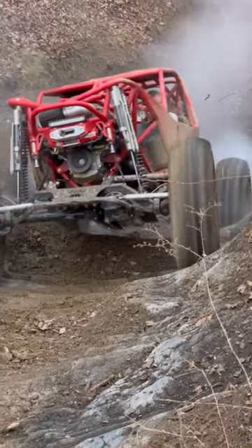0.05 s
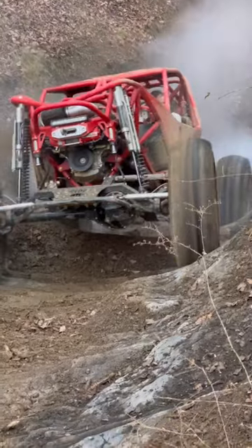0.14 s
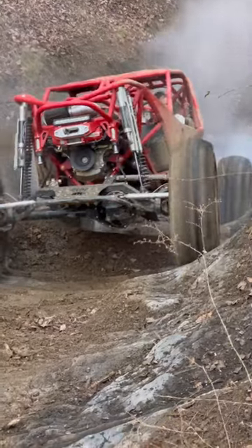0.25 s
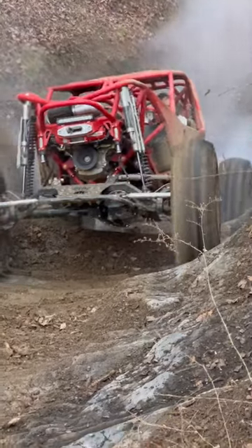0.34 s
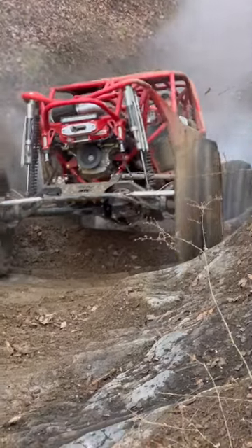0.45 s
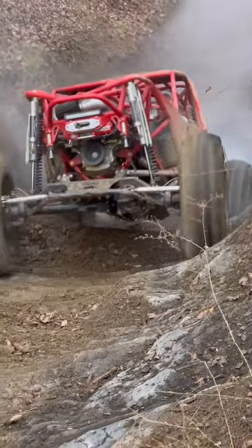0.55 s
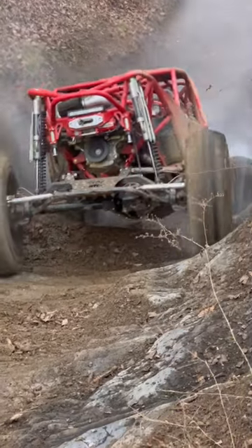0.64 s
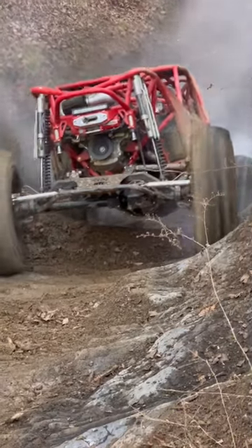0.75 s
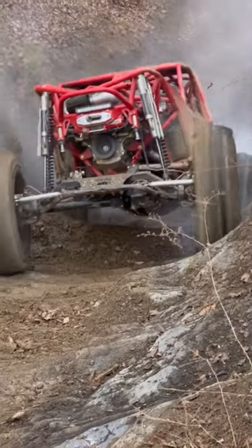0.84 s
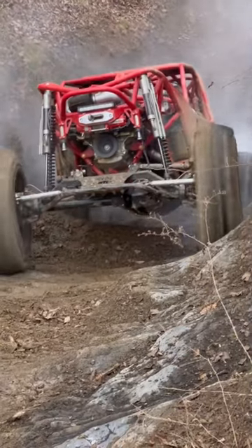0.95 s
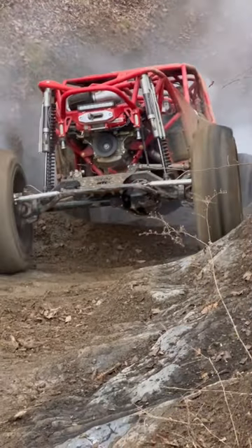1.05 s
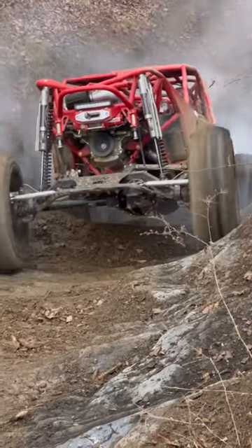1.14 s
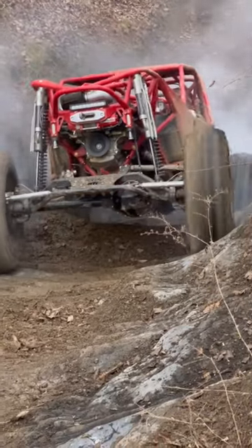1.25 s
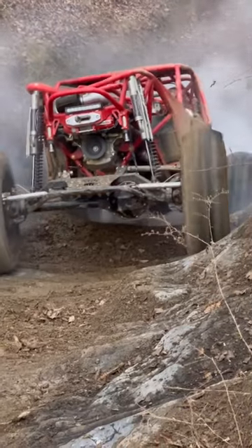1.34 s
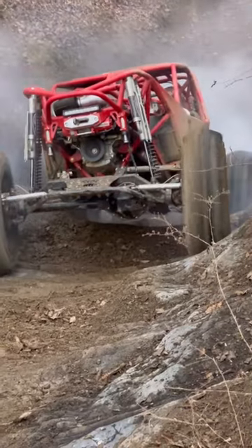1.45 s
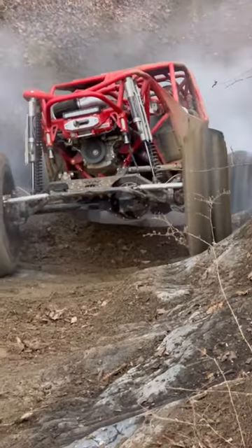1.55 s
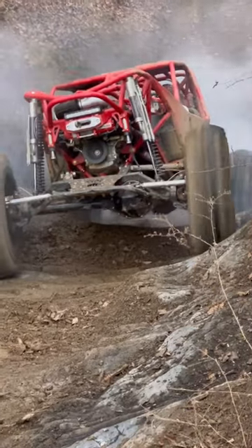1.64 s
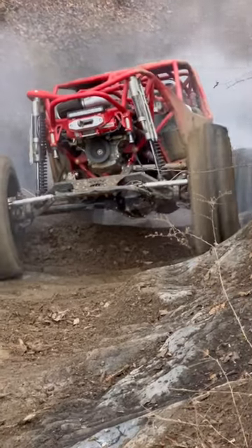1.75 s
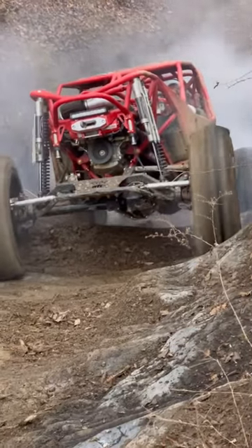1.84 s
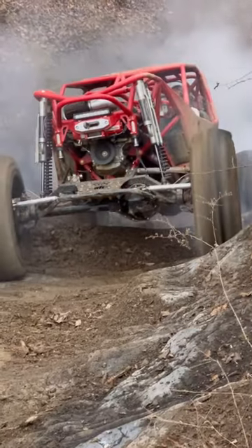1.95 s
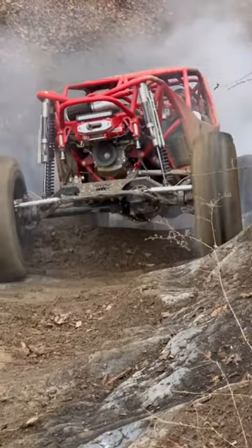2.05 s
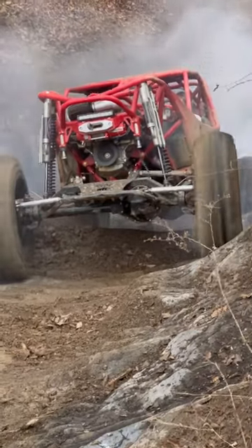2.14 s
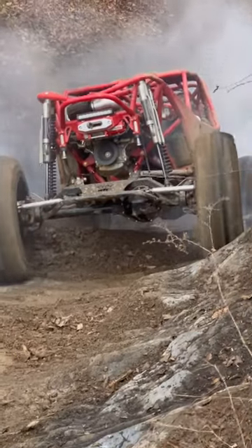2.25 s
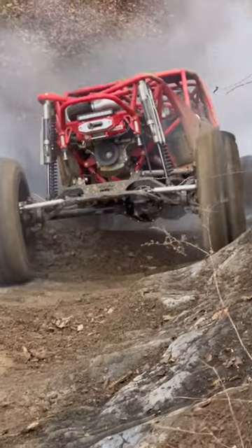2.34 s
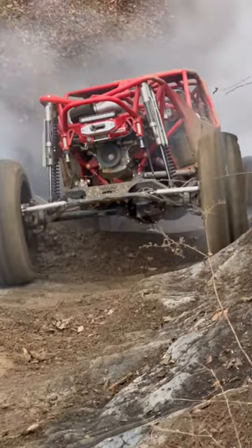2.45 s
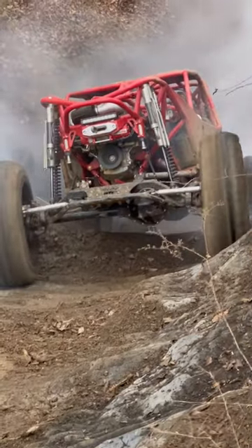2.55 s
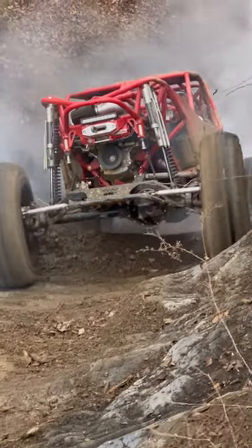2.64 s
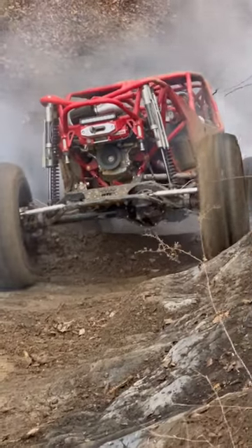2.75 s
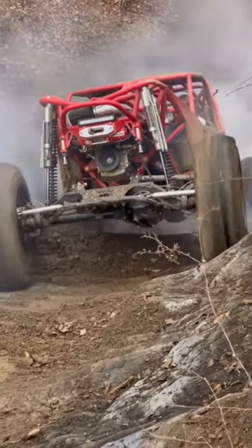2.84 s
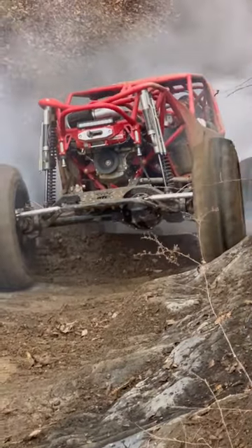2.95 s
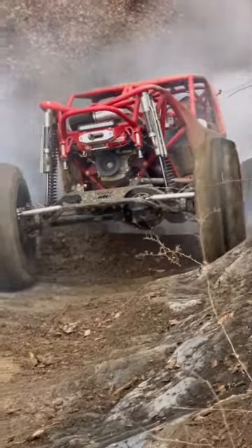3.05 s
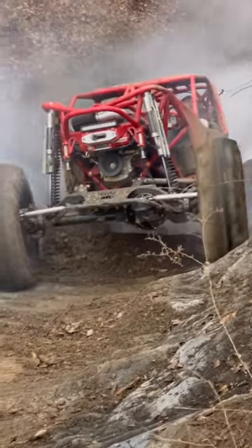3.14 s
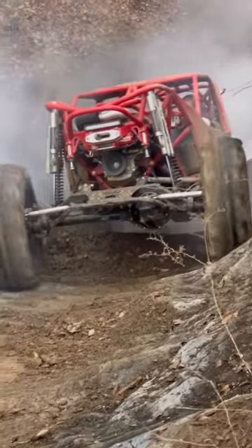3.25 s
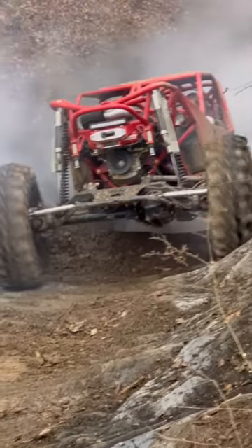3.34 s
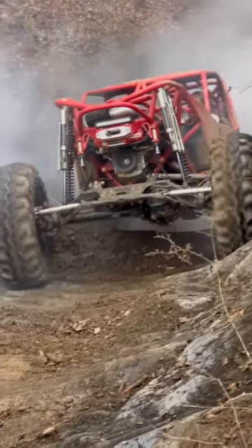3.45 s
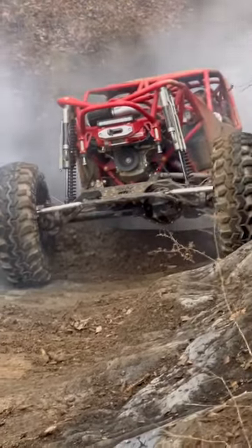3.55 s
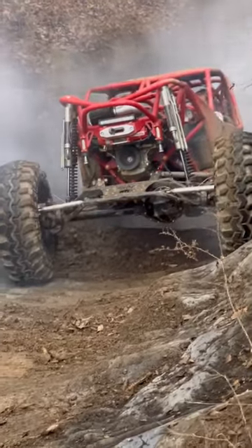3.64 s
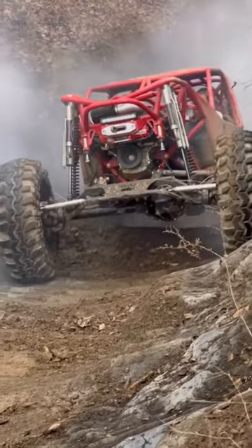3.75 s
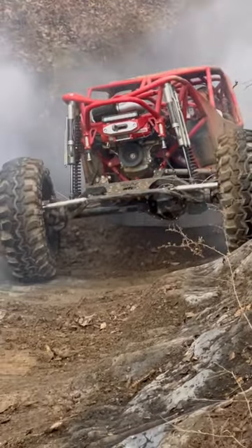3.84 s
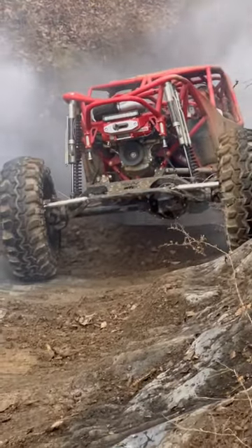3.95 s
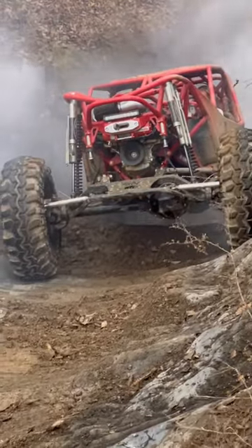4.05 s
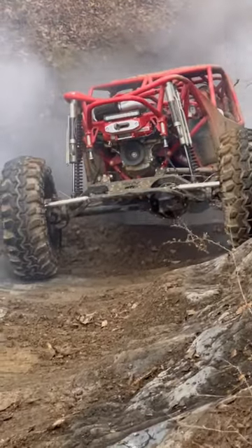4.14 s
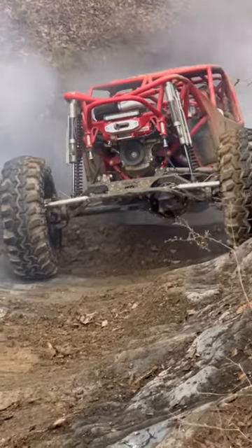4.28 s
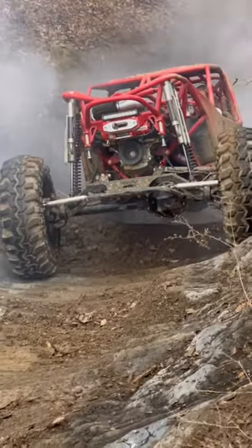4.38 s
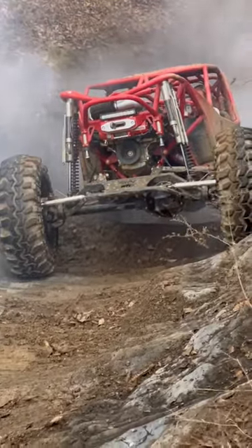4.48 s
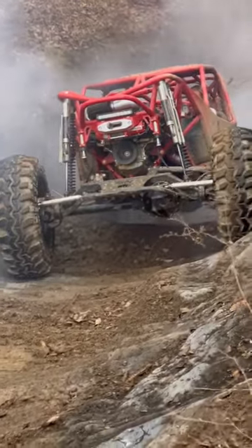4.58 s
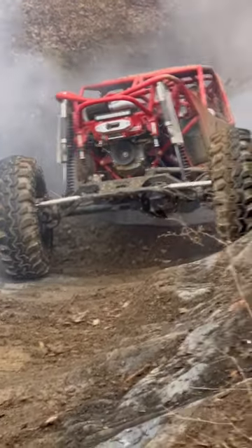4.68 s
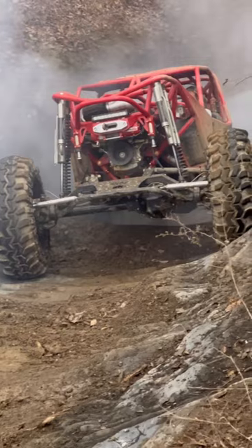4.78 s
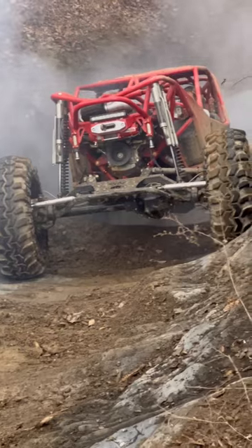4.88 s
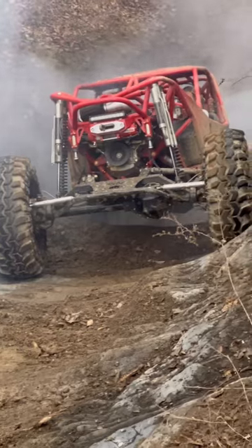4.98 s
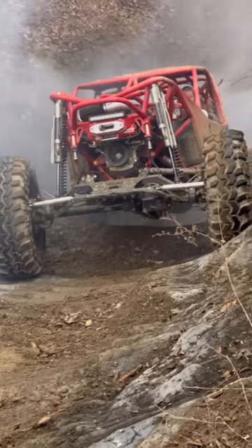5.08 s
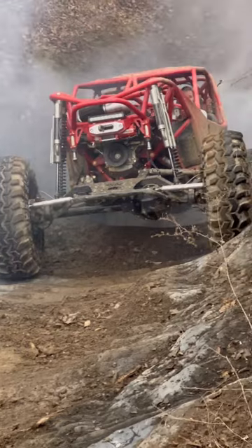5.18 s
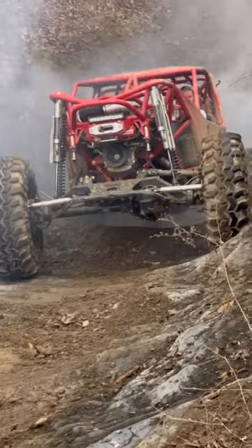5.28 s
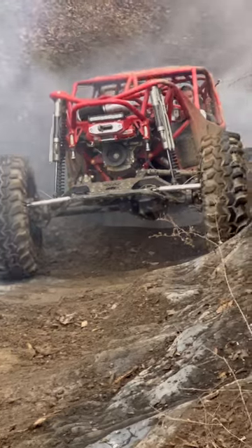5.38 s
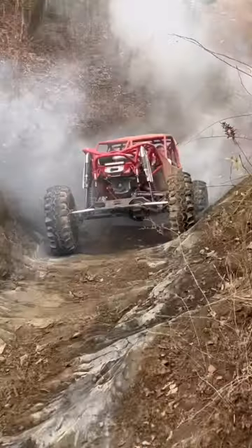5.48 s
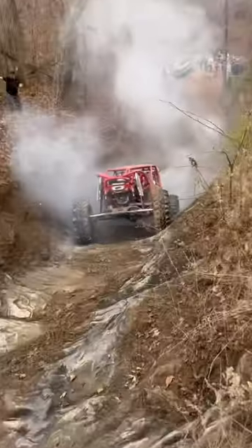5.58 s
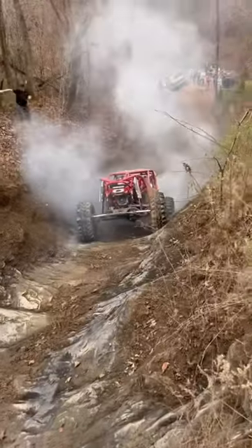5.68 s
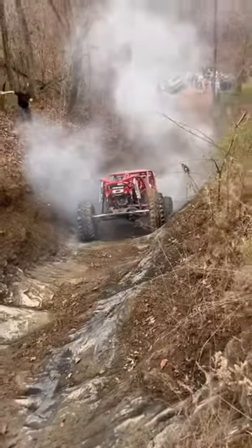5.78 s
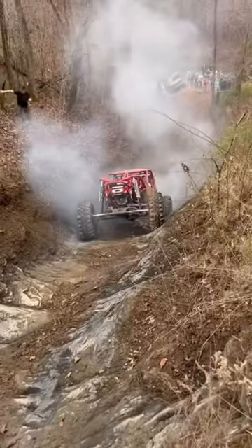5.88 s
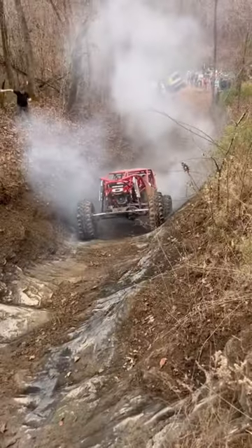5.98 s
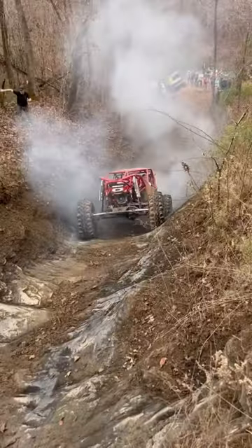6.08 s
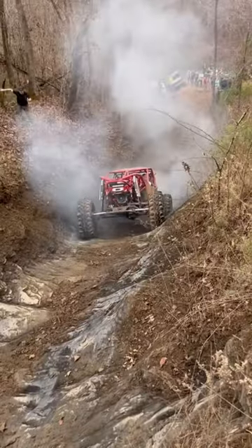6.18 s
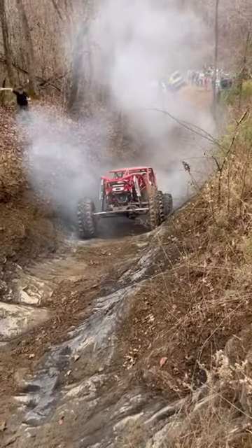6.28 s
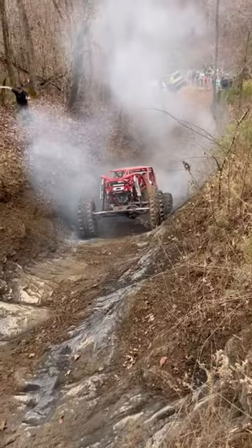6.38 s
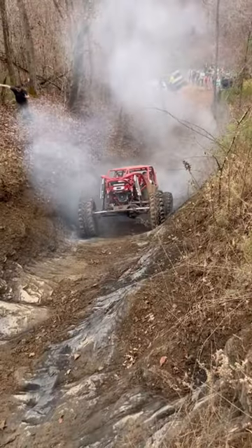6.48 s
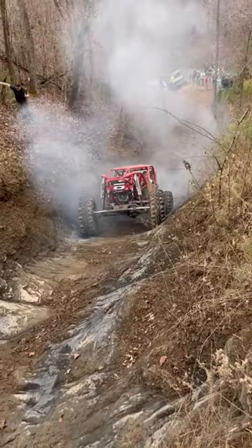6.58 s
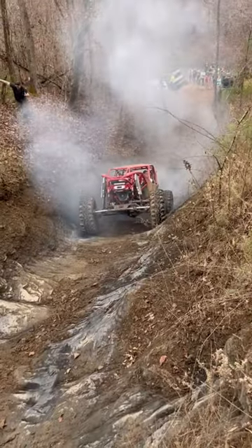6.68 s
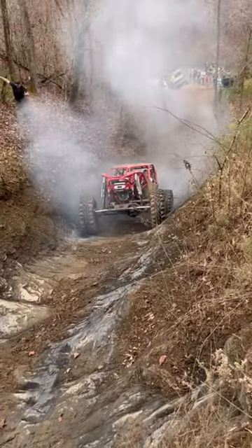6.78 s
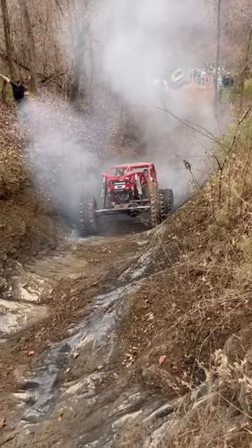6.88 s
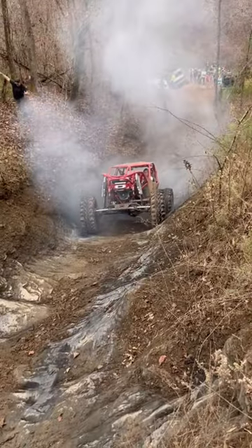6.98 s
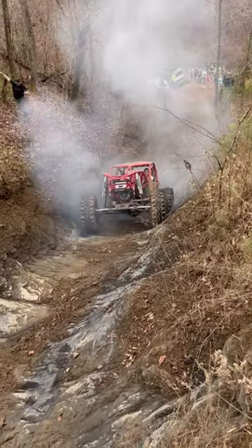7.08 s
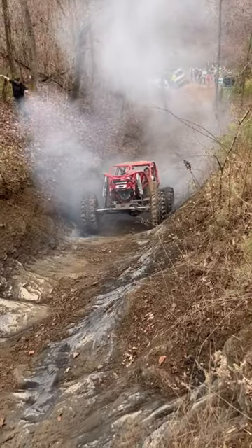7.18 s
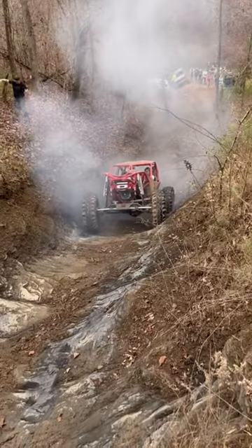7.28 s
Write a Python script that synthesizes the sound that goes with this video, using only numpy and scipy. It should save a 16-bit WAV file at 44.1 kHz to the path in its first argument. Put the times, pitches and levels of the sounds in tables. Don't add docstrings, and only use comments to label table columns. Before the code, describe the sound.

A powerful eight-cylinder off-road buggy on a rocky dirt trail. Pipes burble after a throttle lift, then three roaring surges rise slightly in pitch, each ending in a short popping gap. Tyres chirp faintly and spray gravel. The engine coasts down and settles into an uneven, loping idle with light clatter. Outdoors, close and dry, slightly compressed at the loudest peaks, nearly mono.

```python
import sys
import numpy as np
from scipy import signal
from scipy.fft import rfft, irfft, next_fast_len
from scipy.io import wavfile
from scipy.ndimage import uniform_filter1d, map_coordinates

SR = 44100
rng = np.random.default_rng(int(sys.argv[2]) if len(sys.argv) > 2 else 0)


def invert_db(x):
    u = np.asarray(x, float) / 20
    return 10 ** u


def store_pcm(level_fs):
    pcm = np.round(np.clip(level_fs, -1, 1) * 32767).astype(np.int16)
    wavfile.write(sys.argv[1], SR, np.atleast_2d(pcm).T)


N = 322812
TIME = np.arange(N) / SR


def evened(x):
    return x / np.sqrt(np.mean(abs(x) ** 2) + 1e-20)


def read(points, hz, axis=1):
    table = np.transpose(points)
    return np.interp(np.log(hz + 1), np.log(table[0] + 1), table[axis])


def follow(rows, axis):
    table = np.transpose(rows)
    return np.interp(TIME, table[0], table[axis])


def colour(x, points):
    size = next_fast_len(N)
    gain = invert_db(read(points, np.fft.rfftfreq(size, 1 / SR)))
    return evened(irfft(rfft(x, size) * gain, size)[:N])


def resonate(x, hz, width):
    r = np.exp(-np.pi * width / SR)
    pole = r * np.exp(2j * np.pi * hz / SR)
    return 2 * signal.lfilter([1 - r], [1, -pole], x).real


def twice(x, hz, width):
    return resonate(resonate(x, hz, 2 * width), hz, width)


def drift(hz, count):
    steps = rng.standard_normal((count, 1500))
    span = max(int(100 / hz), 1)
    steps = uniform_filter1d(uniform_filter1d(steps, span), span)
    return [np.interp(TIME * 200, np.arange(1500), evened(row)) for row in steps]


def bend(u, curve):
    return (1 - np.exp(-curve * np.clip(u, 0, 1))) / (1 - np.exp(-curve))


def after(s, delay, width, db):
    return db * np.exp(-((TIME - s - delay) / width) ** 2)


def lift(s, length):
    u = np.clip((TIME - s) / length, 0, 1)
    return np.sin(np.pi * u ** 0.46)


# t/s, level/dB, f/Hz
TICKS = [
    (4.135, -69, 4000),
    (5.443, -62, 2000),
]
# t/s, length/s, f/Hz, level/dB
SQUEAK = (5.345, .065, 7400, -71)


def small_sounds():
    out = np.zeros(N)
    for s, db, hz in TICKS:
        decay = np.exp(-np.maximum(TIME - s, 0) / .012) * (TIME > s)
        burst = rng.standard_normal(N) * decay
        out += invert_db(db) * 2 * resonate(burst, hz, 0.55 * hz)
    s, length, hz, db = SQUEAK
    swell = np.sin(np.pi * np.clip((TIME - s) / length, 0, 1)) ** 0.65
    return out + invert_db(db) * swell * np.sin(2 * np.pi * hz * TIME)


# t/s, length/s, f/Hz, level/dB
CHIRPS = [
    (.3, .08, 1920, -40),
    (1.15, 0.11, 3170, -47),
]


def chirps():
    noise = rng.standard_normal(N)
    return sum(invert_db(db) * lift(s, length) * evened(twice(noise, hz, 70)) for s, length, hz, db in CHIRPS)


# lowest at t/s, rate/Hz, highest at t/s, rate/Hz, early bend of the climb
REVS = [
    (-.5, 45, .04, 54.3, 1.01),
    (.31, 45.2, .832, 55.8, 1.2),
    (1.168, 43.6, 1.662, 56.3, .7),
    (1.955, 45.5, 2.578, 55.9, 1.02),
]
# t/s, cycle rate/Hz
RUN_DOWN = [(2.67, 50.4), (2.86, 42.0), (3.1, 34.1), (3.43, 19.9), (3.6, 14.7), (3.81, 11.81), (4.0, 9.93),
            (4.2, 9.23), (4.4, 9.33), (4.65, 10.22), (4.9, 9.22), (5.5, 8.71), (6.0, 8.8), (7.32, 8.84)]


def speed():
    rate = follow([REVS[-1][2:4]] + RUN_DOWN, axis=1)
    for (t0, low, t1, top, curve), later in zip(REVS, REVS[1:] + [None]):
        climb = low + (top - low) * bend((TIME - t0) / (t1 - t0), curve)
        rate = np.where((TIME >= t0) & (TIME < t1), climb, rate)
        if later:
            drop = top + (later[1] - top) * bend((TIME - t1) / (later[0] - t1), 1.0)
            rate = np.where((TIME >= t1) & (TIME < later[0]), drop, rate)
    return rate


# goes down t/s, time to reach the floor/s, lifts t/s, load level/dB
PEDAL = [
    (-.6, .1, 0.013, -1.5),
    (0.293, 0.047, .828, -1),
    (1.106, 0.18, 1.665, -0.5),
    (1.917, 0.12, 2.585, -2),
]


def crank():
    first_firing_s, catch = 4.277, 0.3
    idling = np.clip((TIME - 3.4) / .5, 0, 1)
    pulling = sum(1. * (TIME > down + catch * press) * (TIME < up) for down, press, up, db in PEDAL)
    throttle = uniform_filter1d(pulling, 900)
    rate = uniform_filter1d(speed(), 1200)
    turns = np.cumsum(rate) / SR
    turns = turns - turns[round(first_firing_s * SR)] % 1 + 1
    return rate, turns, throttle, idling


# pulling level/dB, coasting level/dB at 50 Hz, change per halved speed/dB,
# extra build-up/s, share lingering after a lift
LAYERS = [(-19, -28, 7, 0.0054, 0.068), (-24.5, -37.5, 17.5, 0.066, 0.71), (-27, -44.5, 15, 0.11, 0.95),
          (-42.5, -57, 7.5, 0.21, 0.91)]
# t/s, length/s
WHEELS_STOP = (3.1, .28)
TYRES_DB = [-0.5, 0, -2, -6.5]


def gas_db(rate, layer):
    bite_share, bite_delay_s, bite_s = 0.17, 0.024, 0.013
    lift_s, linger_s = 0.013, 0.066
    pull_db, coast_db, halved_db, build, linger = LAYERS[layer]
    coast_db = coast_db + halved_db * np.log2(np.minimum(rate, 50) / 50)
    coast_db += TYRES_DB[layer] * np.clip((TIME - WHEELS_STOP[0]) / WHEELS_STOP[1], 0, 1)
    if layer == 0:
        coast_db += -1.9 * (np.minimum(TIME, 1.5) - 1)
    boost = np.zeros(N)
    for down, press, up, load_db in PEDAL:
        since = np.maximum(TIME - up, 0)
        fall = (1 - linger) * np.clip(1 - since / lift_s, 0, 1) + linger * np.exp(-since / linger_s)
        bite = bite_share * np.clip((TIME - down - bite_delay_s) / bite_s, 0, 1)
        build_up = (1 - bite_share) * bend((TIME - down) / (press + build), 1.12)
        drive = (bite + build_up) * fall
        boost = np.maximum(boost, drive * (pull_db + load_db - coast_db))
    return coast_db + boost


# t/s, level/dB
GOVERNOR = [(3.4, -10), (3.6, -8.5), (3.8, -12), (4, -14), (4.2, -8), (4.65, -8), (5, -4.5), (5.6, -1.45),
            (7.32, 0.1)]
# settled level/dB, share of the effort, rise per doubled speed/dB
IDLE_LAYERS = [(-32, 0.72, -5.5), (-34.5, 0.64, 4), (-55.5, 0.39, -.4), (-67, 0.64, 17)]


def idle_db(rate, layer):
    db, share, doubled_db = IDLE_LAYERS[layer]
    return db + share * follow(GOVERNOR, axis=1) + doubled_db * np.log2(np.clip(rate / 8.8, 1, 2.3))


def rasp(noise, turns, throttle):
    top_order, lasts_s = 56, .125
    order = np.arange(257)
    a, b = noise[:2 * 60 * 257].reshape(2, 60, 257)
    pattern = irfft((a + 1j * b) / (1 + (order / top_order) ** 6), axis=1)
    pattern = np.concatenate([pattern, pattern[:, :1]], axis=1)
    locked = map_coordinates(pattern, [TIME / lasts_s, turns % 1 * 512], order=1)
    low = signal.sosfiltfilt(signal.butter(3, 50 * top_order, fs=SR, output="sos"), noise)
    share = .65 * throttle
    return noise - (1 - np.sqrt(1 - share)) * low + np.sqrt(share) * low.std() * evened(locked)


# f/Hz, level/dB per Hz
HISS_PULL = [(410, -31), (700, -1.5), (737, -5.5), (994, -8), (1260, -5), (1490, -13), (1630, -9),
             (2200, -10.5), (2440, -12), (5320, -21.5), (10300, -31.5), (11700, -29.5), (15600, -41)]
# f/Hz, level/dB per Hz
HISS_IDLE = [(530, -25), (900, -3), (1640, -12), (2130, -9), (2540, -10), (3270, -16), (3640, -17),
             (5030, -20), (7190, -23), (7730, -23.5), (10400, -27), (11700, -22.5), (15600, -35)]
# delay/s, width/s, level/dB
GULP = (-0.013, 0.037, 3.9)
# t/s, width/s, level/dB
SPRAYS = [
    (.19, .09, 6.5),
    (1.84, 0.09, 6),
]
# f/Hz, width/Hz, level/dB at 50 cycles per s
BELT = (4580, 730, -59)


def hiss(rate, turns, throttle, idling, cycle_depth=0.05, firing_depth=0.36):
    chop = 1 + cycle_depth * np.cos(2 * np.pi * turns) + firing_depth * np.exp(-(8 * turns % 1) / 0.59)
    noise = rng.standard_normal((3, N))
    noise[0] = rasp(noise[0], turns, throttle)
    noise = noise * chop * invert_db(0.46 * drift(12, count=1)[0])
    pull = colour(noise[0], HISS_PULL)
    top = signal.sosfiltfilt(signal.butter(2, 5000, "high", fs=SR, output="sos"), pull)
    fizz_db = gas_db(rate, layer=3) + sum(after(row[0], *GULP) for row in PEDAL)
    fizz_db += sum(after(s, 0, width, db) for s, width, db in SPRAYS)
    pull = invert_db(gas_db(rate, layer=2) + 2) * (pull - top) + invert_db(fizz_db + 2) * evened(top)
    hz, width, db = BELT
    pull += invert_db(db) * (rate / 50) ** 2 * evened(twice(noise[2], hz, width))
    idle_hiss = invert_db(idle_db(rate, layer=3)) * colour(noise[1], HISS_IDLE)
    return (1 - idling) * pull + idling * idle_hiss


def firings(turns, pattern_db, scatter_db):
    count = np.floor(8 * turns).astype(int)
    size_db = np.array(pattern_db)[count % 8] + scatter_db * rng.standard_normal(4000)[count]
    return invert_db(size_db) * (np.diff(count, prepend=count[0]) > 0)


CYLINDERS_DB = [-18, 0, 1, -24, -1, 0, -1, 0]
# f/Hz, width/Hz, level/dB
MUFFLER = [(169.5, 43.4, 10.5), (100, 24, -54)]
HEADER_DB = [-7, -30, -30, -30, -30, 0, -30, -30]
# f/Hz, width/Hz, level/dB, gain per firing a second above idle/dB
HEADER = (232, 52, -26.5, 3)
CLATTER_DB = [5, 3, 1, -1, 0, 0, -5, -7]
# f/Hz, width/Hz, level/dB
CASING = [(570, 118, 4.5), (713, 30.5, 4.5), (283, 20, -1.5), (1016, 84, -21), (98, 96, 16), (215, 91, -7)]


def idle(rate, turns, throttle, idling, lag_turns=.1):
    tone = np.sqrt(2) * np.cos(2 * np.pi * (8 * turns - lag_turns)) * invert_db(.8 * drift(10, count=1)[0])
    puffs = firings(turns, CYLINDERS_DB, scatter_db=1.3) * np.sqrt(70 / (8 * rate))
    puffs = uniform_filter1d(uniform_filter1d(puffs, 205), 150)
    ring = sum(invert_db(db) * twice(puffs, hz, width) for hz, width, db in MUFFLER)
    thumps = uniform_filter1d(firings(turns, HEADER_DB, scatter_db=3), 110)
    hz, width, db, gain_db = HEADER
    ring += invert_db(db + gain_db * np.clip(8 * rate - 68, 0, 6)) * twice(thumps, hz, width)
    clicks = firings(turns, CLATTER_DB, scatter_db=-2.5)
    knocks = signal.lfilter([1], [1, -np.exp(-1 / (0.018 * SR))], clicks)
    rattle = (knocks + .35) * rng.standard_normal(N)
    casing = sum(invert_db(db) * twice(rattle, hz, width) for hz, width, db in CASING)
    late = slice(5 * SR, N)
    layers = (tone, ring / ring[late].std(), 2.8 * casing / casing[late].std())
    return np.sqrt(idling) * sum(invert_db(idle_db(rate, k)) * x for k, x in enumerate(layers))


# t/s, length/s, level/dB
BURBLES = [
    (0.004, 0.19, -23.5),
    (0.822, 0.16, -24.5),
    (1.647, 0.12, -21.5),
    (2.577, 0.047, -21.5),
    (2.637, 0.077, -20.5),
]
# f/Hz, level/dB
BURBLE_TONE = [(30, -28), (55, -10), (105, -2), (160, -5.5), (260, -1.5), (400, -17.5), (620, -20),
               (1200, -54), (3000, -51.5)]


def burble():
    pops = rng.uniform(-1, 1, N) * (rng.random(N) < 350 / SR)
    return colour(pops, BURBLE_TONE) * sum(invert_db(db) * lift(s, length) for s, length, db in BURBLES)


def slow_level(x):
    return np.sqrt(uniform_filter1d(x ** 2, 5000) + 1e-4)


# f/Hz, level/dB
PIPE = [(45, -27.5), (100, -3.5), (143, -2.5), (180, -9), (225, 5), (275, 2), (320, -0.5), (385, -13.5),
        (435, -12), (480, -10.5), (590, -3.5), (720, -11), (1000, -11.5), (1500, -27.5)]
# f/Hz, level/dB
COAST_PIPE = [(40, -38.5), (70, 0), (110, -8), (145, -10), (185, 0), (240, -8), (290, -6.5), (340, -15),
              (430, -9), (600, -1), (800, -18.5), (1500, -28)]
# pulling level/dB, coasting level/dB
PATTERN = [(-2.5, -27), (-1.5, 10), (-5.5, -9.5), (4, 4), (-2, 1.5), (-0.5, 5.5), (-7, 3.5), (-8.5, 0),
           (4, 2.5), (1, -7.5), (-4.5, -1), (4.5, 4), (2.5, 0.5), (2.5, 7.5), (-4, 3), (2.5, 4)]
# delay/s, width/s, level/dB
REBOUND = (.085, 0.012, 5.8)


def roar(rate, turns, throttle, idling, pull_rough=.125, coast_rough=.23):
    part = slice(0, 4 * SR)
    body_db = gas_db(rate, layer=0) + sum(after(row[2], *REBOUND) for row in PEDAL)
    bark_db = gas_db(rate, layer=1)
    rate, turns, throttle = rate[part], turns[part], throttle[part]
    rough = coast_rough + (pull_rough - coast_rough) * throttle
    wobble, start = drift(14, count=64), rng.random(32)
    start[8] = -.1
    low, high = np.zeros(N), np.zeros(N)
    for k in range(1, 32):
        pull_db, coast_db = PATTERN[k % 16]
        coast_db = coast_db - 1.45 * max(k - 7, 0) * np.clip(1 - rate / 45, 0, 1)
        coast_db = coast_db - 6 * max(7 - k, 0) * np.clip(1 - rate / 24, 0, 1)
        coast_db = coast_db + 9 * (k in (6, 8)) * np.clip(3 - rate / 11, 0, 1)
        pull_db = pull_db + read(PIPE, k * rate)
        coast_db = coast_db + read(COAST_PIPE, k * rate)
        coast_waver = max(.3 * (k - 8), .6 - (k in (6, 8)))
        depth = rough * (1 + .08 * k * throttle + coast_waver * (1 - throttle))
        shake = depth * (wobble[k][part] + 1j * wobble[k + 32][part])
        line = ((1 + shake) * np.exp(2j * np.pi * (k * turns + start[k]))).real
        line *= invert_db(coast_db + (pull_db - coast_db) * throttle)
        upper = np.clip((k * rate - 350) / 80, 0, 1)
        low[part] += (1 - upper) * line
        high[part] += upper * line
    fuzz = invert_db(-16) * colour(rng.standard_normal(N), PIPE + [(3000, -60)])
    flutter = evened(twice(fuzz, 22, 30))[part]
    high[part] *= 1 + (1 - throttle) * (.8 * flutter - .45)
    lifted = 1 - 0.43 * sum(lift(s, length) for s, length, db in BURBLES)
    body = invert_db(body_db) * (low / slow_level(low) * lifted + fuzz)
    bark = invert_db(bark_db + 1.0) * high / slow_level(high)
    return (1 - idling) * (body + bark)


# f/Hz, diffuse level/dB, left lean, left lead
PORTS = [(100, -54, 0, 0), (250, -34, 0, 0), (450, -18, .05, -.03), (700, -15, .05, -.1),
         (1200, -16, -.12, 0), (3000, -12, 0, 0), (5500, -6, 0, -.5), (8000, -4, 0, -.7),
         (15000, -2, 0, -.7)]


def scene():
    state = crank()
    mid = small_sounds() + chirps() + hiss(*state) + idle(*state) + burble() + roar(*state)
    scatter = rng.standard_normal(8000) * np.exp(-np.arange(8000) / (.04 * SR))
    diffuse = signal.oaconvolve(mid, scatter / np.linalg.norm(scatter))[:N]
    size = next_fast_len(N + SR)
    hz = np.fft.rfftfreq(size, 1 / SR)
    direct = (read(PORTS, hz, axis=2) + .5j * read(PORTS, hz, axis=3)) * rfft(mid, size)
    scattered = invert_db(read(PORTS, hz)) * rfft(diffuse, size)
    side = irfft(direct + scattered, size)[:N]
    return np.array([mid + side, mid - side])


# from t/s, to t/s, low f/Hz, high f/Hz
MERGED = [(0, 5.7, 1680, 5150), (5.7, 8, 1500, 2250), (5.7, 8, 3950, 4250)]


def merge_bands(stereo):
    hz, t, z = signal.stft((stereo[0] - stereo[1]) / 2, SR, nperseg=2048)
    for t0, t1, low, high in MERGED:
        z[np.ix_((hz > low) & (hz < high), (t >= t0) & (t < t1))] = 0
    side = signal.istft(z, SR, nperseg=2048)[1][:N]
    return stereo.mean(0) + np.array([side, -side])


def roll_off(x):
    return signal.sosfilt(signal.butter(12, 15780, fs=SR, output="sos"), x)


def record(dry):
    dry = signal.sosfilt(signal.butter(4, 43, "high", fs=SR, output="sos"), dry)
    dry = .84 * np.tanh(dry / .75)
    mix = merge_bands(dry)
    return roll_off(mix)


dry = scene()
out = record(dry)
store_pcm(out)
```